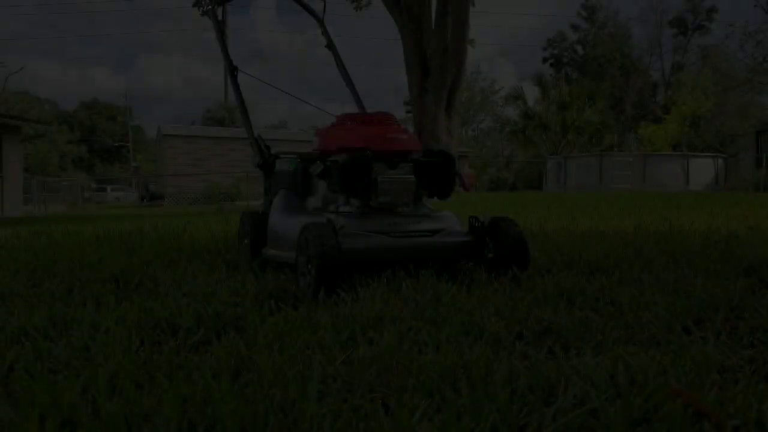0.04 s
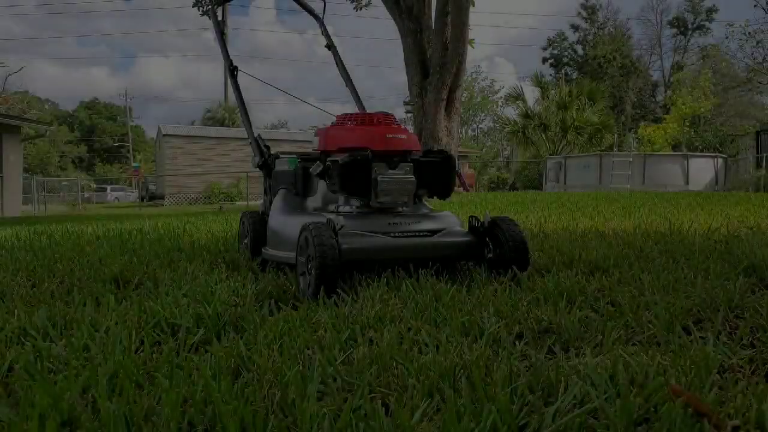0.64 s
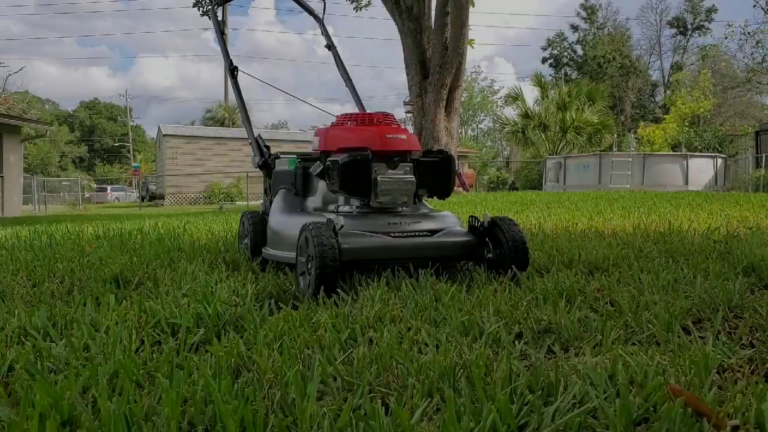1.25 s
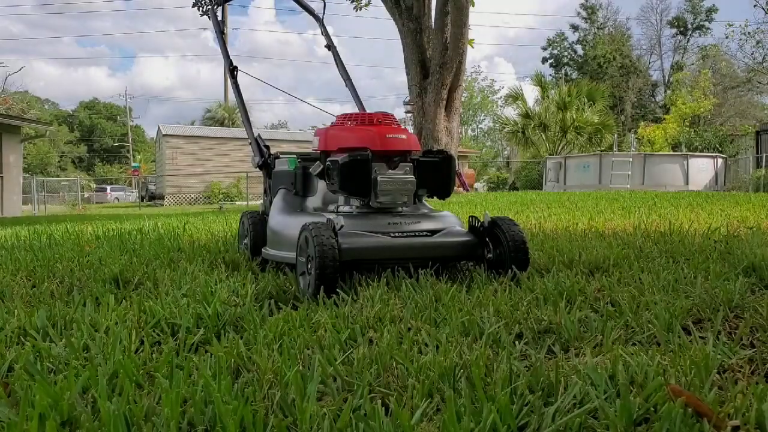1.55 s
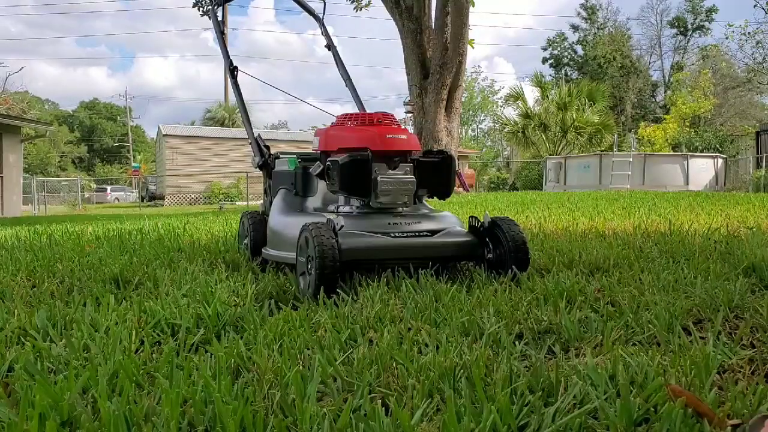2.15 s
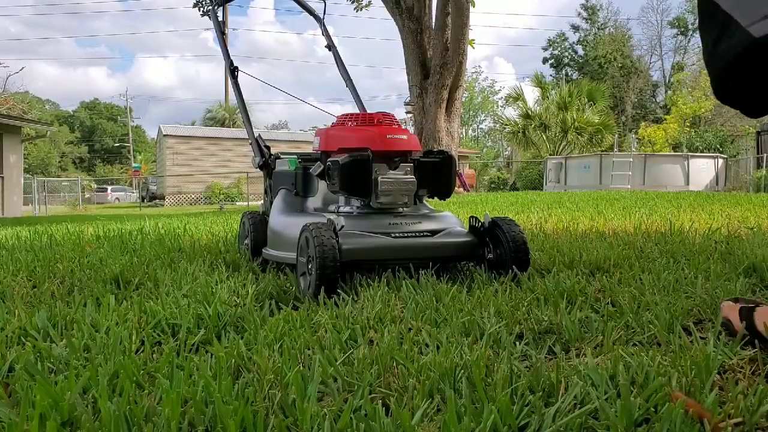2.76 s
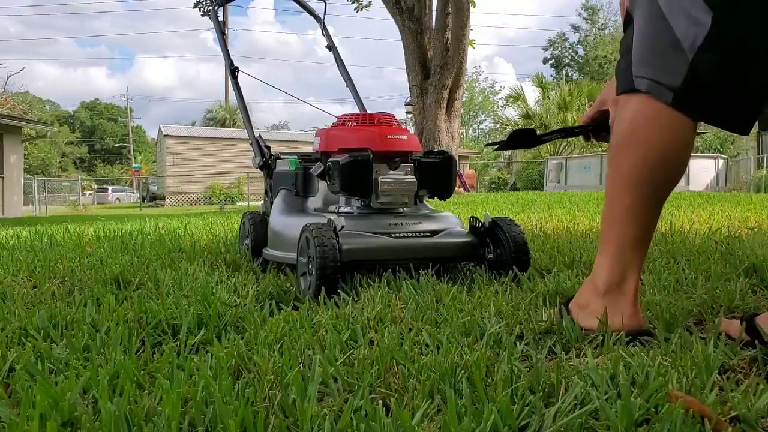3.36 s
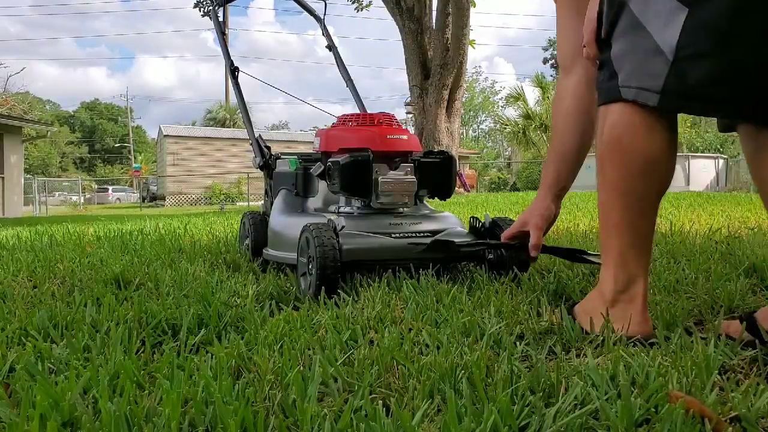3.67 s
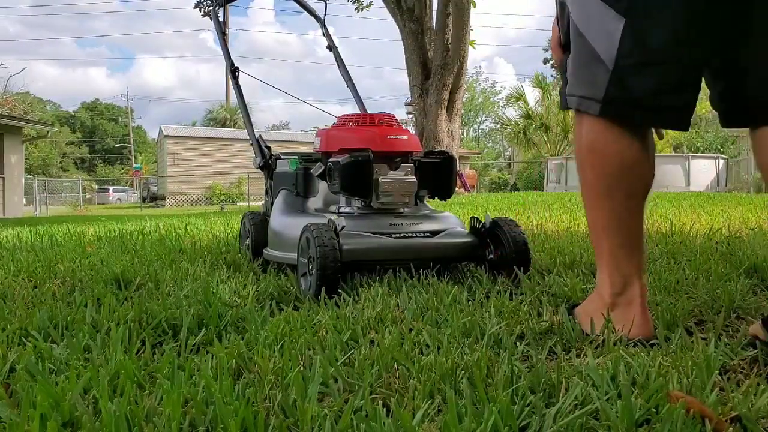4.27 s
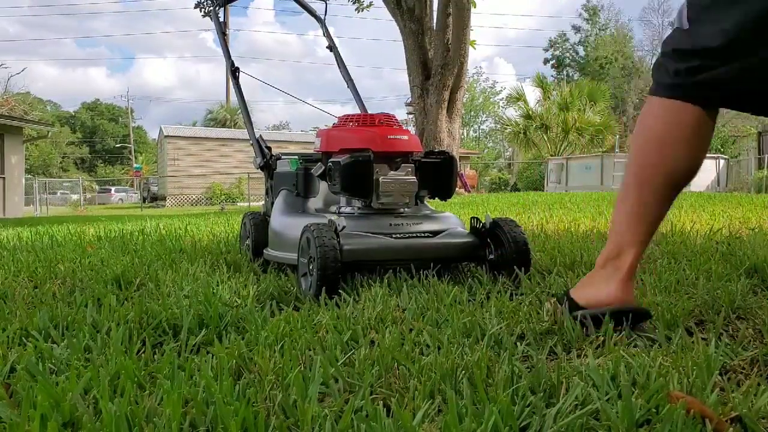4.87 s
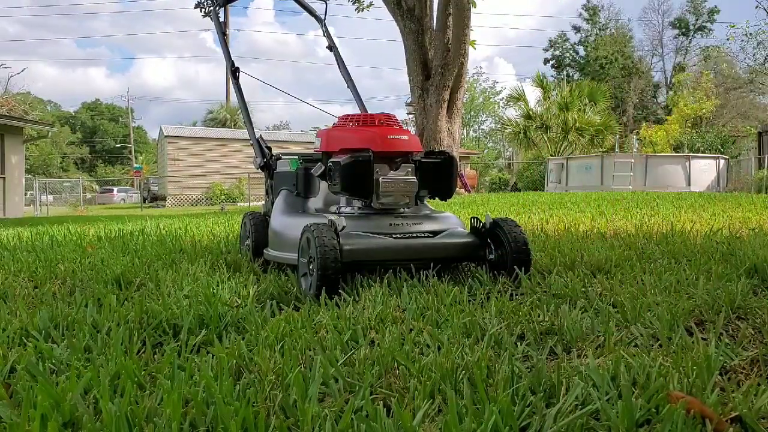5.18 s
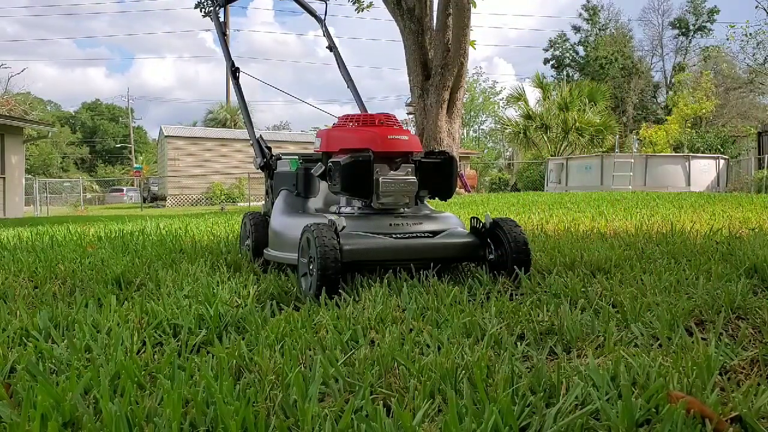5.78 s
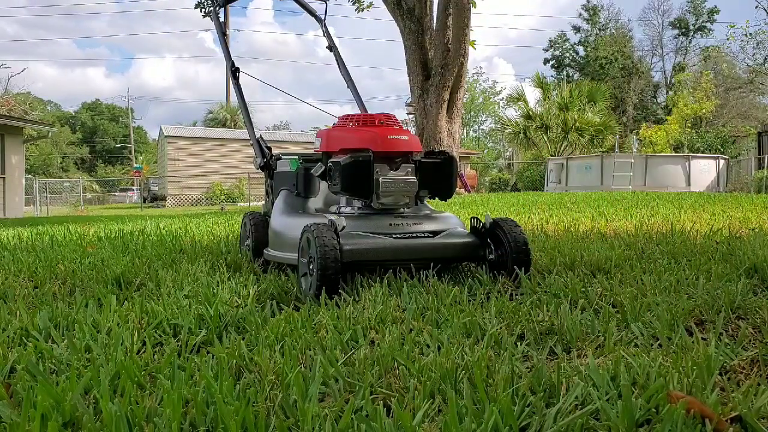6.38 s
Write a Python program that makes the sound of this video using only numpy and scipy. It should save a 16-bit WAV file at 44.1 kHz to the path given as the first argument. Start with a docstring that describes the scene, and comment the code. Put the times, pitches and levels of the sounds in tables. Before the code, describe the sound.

Steel mower blades clash, slide and settle with bright clinks, between soft flip-flop steps on a breezy lawn.

```python
"""Two steel mower blades are laid against a parked mower: they clash, slide and settle with fading clinks.
Each touch makes the steel ring with many tones at once, and the first blow also knocks the mower's deck.
Before and after, someone walks over the lawn in flip-flops: leaves swish, stalks crunch, soles slap.
Light wind, faint insects and the drone of a far engine fill the garden."""
import sys
import numpy as np
from scipy import signal
from scipy.io import wavfile
from scipy.ndimage import uniform_filter1d, minimum_filter1d

SR = 44100
rng = np.random.default_rng(int(sys.argv[2]) if len(sys.argv) > 2 else 0)


def put_to_file(sound):
    """Save the sound as 16-bit audio at rate SR, in the file named by the first command-line argument."""
    columns = np.atleast_2d(sound).T  # one column per channel
    safe = np.clip(columns, -1, 1)
    whole_steps = np.round(safe * 32767)
    wavfile.write(sys.argv[1], SR, whole_steps.astype(np.int16))


N = 292383
T = np.arange(N) / SR

# Slowly swelling open air. Each row: time in seconds, relative rumble in dB, relative breeze in dB.
AIR_LEVELS = [(0.0, -35.5, -48.5), (.55, -39, -49), (1.0, -35.5, -45), (1.4, -34.5, -43.5),
              (2.1, -35, -43.5), (4.0, -35.5, -44), (5.2, -35, -43), (5.8, -35.5, -43), (6.63, -35, -43.5)]
# Steel touches steel. Each row: start in seconds, strength in dB, share of the free ring time,
# treble tilt in dB per octave, favoured pitch in Hz.
BLADE_TOUCHES = [(4.081, -20, 0.32, 5, 4430), (4.0849, -4.5, 0.29, 1, 8700), (4.1024, -3, 0.98, 5.5, 9300),
                 (4.105, -5, .15, -0.5, 8130), (4.123, -11, 0.7, 4, 3690), (4.160, -12.5, 0.72, -1, 3660),
                 (4.190, -16, 0.8, -10, 3615), (4.23, -17.5, 0.99, -8, 3100), (4.252, -14, .5, -4, 3680),
                 (4.264, -14.5, 0.68, -4.5, 3981), (4.291, -21.5, 0.83, -12, 2770),
                 (4.339, -24.5, 0.6, -3, 2770), (4.403, -17, 0.99, -5.5, 4010),
                 (4.432, -22.5, 0.97, -3.5, 5960), (4.503, -26, 1, -7, 2840),
                 (4.615, -24.5, 0.76, -6, 2870), (4.701, -34, .5, -6, 3230)]
# The blades' own tones. Each row: pitch in Hz, relative level in dB, free ring time in seconds,
# left ear over right in dB.
BLADE_TONES = [(1793, -46, 0.35, -4), (2191, -40, 0.42, 1), (2430, -40, 0.35, 0), (2511, -34, 0.36, -1),
               (2767, -35, 0.8, 1), (2860, -42, 0.5, 0), (2980, -38, 0.37, 3), (3205, -35, 0.45, 2),
               (3244, -33, 0.45, 0), (3278, -34, 0.44, 5), (3585, -35, 0.45, -3), (3615, -35, 0.5, -3),
               (3787, -35, 0.45, -5), (3887, -35, 0.36, 2), (3981, -35, 0.65, 0), (4202, -39, 0.48, -4),
               (4290, -37, 0.5, -2), (4430, -39, 0.4, -3), (4592, -32, 0.43, -7), (4778, -34, 0.5, 1),
               (4878, -34, 0.38, 2), (5203, -39, 0.53, -12), (5507, -35, 0.52, -8), (5590, -39, 0.4, -5),
               (6020, -36, 0.8, -5), (6245, -36, 0.42, -3), (6654, -31, 0.35, -1), (7029, -29, 0.26, -12),
               (7195, -34, 0.32, -12), (7394, -38, 0.28, -10), (7905, -32, 0.24, -12),
               (8153, -30, 0.25, -8), (8565, -36, 0.36, -4), (8670, -30, 0.22, 2), (8780, -32, 0.27, -1),
               (9100, -32, 0.23, -2), (9173, -35, 0.2, 3), (9385, -41, 0.4, -5), (9590, -34, 0.33, -11),
               (9660, -32, 0.4, -3), (10250, -42, 0.45, -3), (10530, -35, 0.28, 1), (11039, -34, 0.26, -1),
               (11512, -31, 0.3, 6), (11900, -37, 0.3, -4), (12083, -34, 0.33, -5), (12247, -30, 0.2, -2),
               (12726, -35, 0.32, -9), (12858, -32, 0.24, -12), (14040, -38, 0.3, -6),
               (14909, -34, 0.28, -8), (15286, -37, 0.33, -4), (15719, -30, 0.23, -12)]


def from_db(db):
    """Turn decibels into a gain."""
    return 10 ** (np.asarray(db) / 20)


def rms_one(x):
    """Scale to an average power of 1."""
    return x / np.sqrt(np.mean(x ** 2) + 1e-20)


def panned(left_db):
    """Gains for the two ears; a negative left_db puts the sound to the right."""
    return rms_one(from_db(np.array([[.5], [-.5]]) * left_db))


def at_hz(points, hz):
    """Read a level or other value between rows that start with a frequency."""
    known_hz, values = np.transpose(points)
    return np.interp(np.log(hz), np.log(known_hz), values)


def drift(rate_hz):
    """A smooth random wobble, about 1 in size."""
    step = 40   # samples between random points
    pole = np.exp(-2 * np.pi * step * rate_hz / SR)
    slow = signal.lfilter([1], [1, -2 * pole, pole * pole], rng.standard_normal(N // step + 2002))[2000:]
    return np.interp(np.arange(N) / step, np.arange(len(slow)), rms_one(slow))


def coloured_noise(spectrum, flutter_db):
    """Stereo noise in fluttering bands. Each spectrum row: frequency in Hz, relative level in dB."""
    # How alike the ears are. Each row: frequency in Hz, likeness from -1 (opposite) to 1 (the same).
    ear_likeness = [(60, 0.97), (125, 0.98), (250, 0.8), (500, 0.51), (900, -0.24), (2000, 0.086),
                    (5000, -0.14), (15000, 0.0099)]
    out, edges = 0, 19 * 2 ** np.arange(0, 10.1, .5)
    white = rng.standard_normal((2, 2, N))
    for k, (low, high) in enumerate(zip(edges, edges[1:])):
        hz, flutter = np.sqrt(low * high), drift(8.6)
        if high < spectrum[0][0] or low > spectrum[-1][0]:
            continue
        band = signal.butter(3, [low, high], "band", fs=SR, output="sos")
        mid, side = signal.sosfilt(band, white[k % 2])
        alike = at_hz(ear_likeness, hz)
        gain = from_db(at_hz(spectrum, hz) + flutter_db * flutter)
        out = out + gain * (np.sqrt(1 + alike) * mid + np.sqrt(1 - alike) * side * [[1], [-1]])
    return rms_one(out)


def dying(t, t60):
    """A fade that falls by 60 dB in t60 seconds, the ring time."""
    return np.exp(-np.log(1000) * t / t60)


def add(out, s, sound):
    """Mix a sound in at s seconds."""
    at = int(s * SR)
    out[..., at:at + sound.shape[-1]] += sound[..., :N - at]


def swells(rows):
    """A loudness curve: each swell climbs 10 dB in its rise time and sinks 10 dB in its fall time."""
    power = 0
    for peak_s, db, rise_s, fall_s in rows:
        from_peak = np.maximum((peak_s - T) / rise_s, (T - peak_s) / fall_s)
        power = power + from_db(db - 10 * from_peak) ** 2
    return np.sqrt(power)


def strokes(rows, rise_share):
    """Swells for foot movements, all rising for the same share of their length."""
    return swells([(s, db, rise_share * length, (1 - rise_share) * length) for s, db, length in rows])


def gain_control(x, threshold_db, most_cut_db, sense_s, hold_s, release_db_per_s):
    """A loud sound turns the volume down; it stays down for a while, then creeps back."""
    power = uniform_filter1d(np.mean(x ** 2, axis=0), int(sense_s * SR))
    level_db = 10 * np.log10(np.maximum(power, 1e-12))
    wanted_db = np.clip(level_db - threshold_db, 0, most_cut_db)
    half = int(hold_s * SR / 2)
    held_db = -minimum_filter1d(-wanted_db, 2 * half + 1, origin=half, mode="constant")
    cut_db = np.maximum.accumulate(held_db + release_db_per_s * T) - release_db_per_s * T
    return x * from_db(-cut_db)


def echoes(x, echo_db, dull_hz, count):
    """Add a few dull echoes off the tree, the shed and the house, other ones in each ear."""
    dull = from_db(echo_db) * signal.sosfilt(signal.butter(1, dull_hz, fs=SR, output="sos"), x)
    out = x.copy()
    for ear in range(2):
        for delay_s in rng.uniform(.008, .055, count):
            add(out[ear], delay_s, dull[ear] * dying(delay_s, 0.35))
    return out


def air_levels():
    """The rumble and breeze curves at every sample."""
    seconds, *columns = np.transpose(AIR_LEVELS)
    return [np.interp(T, seconds, column) for column in columns]


def wind(rumble_db, breeze_db):
    """Open air rumbles low while a breeze moves through the trees."""
    # The tone of each noise. Each row: frequency in Hz, relative level in dB.
    rumble_colour = [(20, -40), (30, -23), (42, -8.5), (62, 3), (85, 0.5), (125, -5), (150, -8),
                     (200, -6.5), (260, -15), (400, -33)]
    breeze_colour = [(150, -17.5), (280, 2.5), (480, -2), (800, 3), (1200, -2), (1800, -7), (2600, -18.5),
                     (4000, -25.5), (7000, -34.5), (9000, -33.5), (12000, -33), (15500, -33)]
    low_db, wind_db = air_levels()
    rumble = from_db(low_db + rumble_db) * coloured_noise(rumble_colour, flutter_db=1.17)
    breeze = from_db(wind_db + breeze_db) * coloured_noise(breeze_colour, flutter_db=1.17)
    return rumble + breeze


def far_engine(engine_db, waver_hz, throb_db):
    """A far engine drones on a few wavering tones that swell with the air's rumble."""
    # Each row: pitch in Hz, relative level in dB.
    engine_tones = [(75.5, -45), (90, -43), (106, -47.5), (179, -54.5), (199, -54.5), (266, -57)]
    low_db, _ = air_levels()
    drone = 0
    for hz, db in engine_tones:
        phase = 2 * np.pi * np.cumsum(hz + waver_hz * drift(2.03)) / SR
        drone = drone + np.sqrt(2) * from_db(db + engine_db + throb_db * drift(1.5)) * np.sin(phase)
    return drone * from_db(low_db - low_db.mean())


def insects():
    """Far insects in the trees merge into a steady shrill: narrow bands of noise."""
    # Each row: pitch in Hz, band width in Hz, level in dB.
    shrill_bands = [(9100, 640, -73), (10180, 300, -75), (10500, 250, -80)]
    out = 0
    for hz, width_hz, db in shrill_bands:
        shrill = signal.lfilter(*signal.iirpeak(hz, hz / width_hz, fs=SR), rng.standard_normal((2, N)))
        out = out + from_db(db) * rms_one(shrill)
    return out


def scuffing(scuff_db, grain_db, left_db):
    """Soles press into the dry thatch under the grass with a dull crackle."""
    # Each row: peak time in seconds, relative level in dB, length in seconds.
    presses = [(.9, -61.5, .2), (1.05, -56, .08), (1.44, -63, .17), (1.605, -45.5, .05),
               (1.685, -45.5, 0.042), (2.24, -51, .09), (2.56, -53, 0.083), (2.92, -52, 0.056),
               (3.02, -56.5, 0.076), (3.15, -58, 0.15), (3.44, -61, .2), (5.58, -53, .04),
               (6.06, -47.5, 0.022)]
    # The tone of the thatch. Each row: frequency in Hz, relative level in dB.
    thatch_colour = [(2000, -12), (2800, -2.5), (3800, 0), (5000, -10), (6500, -16), (11000, -12.5)]
    grains = rms_one(from_db(grain_db * drift(300)))
    crackle = grains * coloured_noise(thatch_colour, flutter_db=2.5)
    return from_db(scuff_db) * strokes(presses, rise_share=.45) * crackle * panned(left_db)


def grass(swish_db, grain_db, crunch_db, crunch_grain_db, left_db):
    """Countless leaves flick past the feet; now and then a tuft is crushed."""
    # A foot sweeps by. Each row: peak time in seconds, relative level in dB, length in seconds.
    sweeps = [(.32, -63, .16), (.49, -61, 0.14), (.85, -53.5, 0.08), (.93, -67, .2), (1.05, -49.5, .06),
              (1.29, -53.5, .05), (1.42, -48, 0.13), (1.53, -44.5, 0.12), (1.61, -39.5, 0.066),
              (1.68, -46, .06), (1.87, -53, 0.11), (2.0, -60, .3), (2.18, -47.5, 0.16), (2.27, -46, 0.084),
              (2.36, -46, 0.054), (2.44, -46, 0.058), (2.56, -58, 0.42), (2.91, -53, 0.24),
              (3.13, -57, 0.39), (3.44, -50, 0.25), (4.07, -48.5, 0.055), (4.79, -49, 0.12),
              (4.97, -59.5, 0.47), (5.49, -52, .14), (5.66, -51.5, 0.06), (5.73, -49, .06),
              (5.94, -62, .14), (6.1, -47, 0.044), (6.42, -61, .1), (6.6, -56.5, .1)]
    # Stalks snap. Each row: start in seconds, relative level in dB, fade time in seconds.
    snaps = [(.464, -47, 0.033), (.831, -53, .1), (1.040, -54, .1), (1.091, -39.5, .02),
             (1.525, -37, 0.027), (1.579, -36, .04), (1.596, -36, 0.065), (1.602, -39, 0.061),
             (1.626, -37, 0.036), (2.235, -44.5, 0.071), (2.358, -33, 0.015), (2.428, -28, 0.022),
             (2.440, -54, .05), (2.709, -39, 0.013), (2.910, -54, .08), (3.519, -43, 0.014),
             (4.784, -50, .1), (4.841, -39, 0.022), (5.133, -35.5, 0.01), (5.729, -46, 0.027),
             (6.05, -40.5, 0.086), (6.104, -48, 0.027), (6.380, -42.5, .02)]
    # The tone of leaves and of stalks. Each row: frequency in Hz, relative level in dB.
    leaf_colour = [(1000, -14), (2200, -6.5), (3800, -4), (6500, -7.5), (8200, -8), (11500, -4), (16000, 3)]
    stalk_colour = [(1000, -6), (2200, -4), (3800, -2.5), (6500, -5), (8200, -8.5), (11500, -7), (16000, 1)]
    swish = from_db(swish_db) * strokes(sweeps, rise_share=.58) * rms_one(from_db(grain_db * drift(550)))
    crunch = np.zeros(N)
    for s, db, t60 in snaps:
        add(crunch, s, from_db(crunch_db + db) * dying(T[:SR // 4], t60))
    crunch *= rms_one(from_db(crunch_grain_db * drift(700)))
    leaves = swish * coloured_noise(leaf_colour, flutter_db=2.0)
    stalks = crunch * coloured_noise(stalk_colour, flutter_db=1.5)
    return (leaves + stalks) * panned(left_db)


def flip_flops(thud_hz, thud_t60, slap_t60, left_db):
    """A rubber sole claps on the heel: a few quickly dying tones over a short thud."""
    # Each row: start in seconds, level in dB, main pitch in Hz, thud over clap in dB.
    heel_slaps = [(1.525, -28.5, 2220, -7), (2.428, -23.5, 1805, 7.5), (5.729, -29.5, 2600, 6)]
    clap_tones = [(.8, 1), (1, -1.25), (1.2, 0.72), (1.6, -0.21), (2.2, 0.18)]
    out, t = np.zeros((2, N)), T[:SR // 10]
    for s, db, hz, thud_db in heel_slaps:
        clap = sum(gain * np.sin(2 * np.pi * hz * ratio * t) for ratio, gain in clap_tones)
        thud = from_db(thud_db) * np.sin(2 * np.pi * thud_hz * t) * dying(t, thud_t60)
        add(out, s, from_db(db) * (clap * dying(t, slap_t60) + thud) * panned(left_db))
    return out


def deck_knock(struck_s):
    """The first blow also knocks the mower's deck, which rings low and briefly."""
    # Each row: pitch in Hz, level in dB, ring time in seconds.
    deck_tones = [(500, -34.5, 0.086), (797, -35, 0.12), (1305, -39, 0.17)]
    out, t = np.zeros((2, N)), T[:SR // 4]
    for hz, db, t60 in deck_tones:
        add(out, struck_s, from_db(db) * np.sin(2 * np.pi * hz * t) * dying(t, t60))
    return out


def grinding(grit_db, left_db, width_hz, direct_db, body_db):
    """The edges slide after the hardest touches, and grit keeps the pressed steel sounding."""
    # Each row: peak time in seconds, relative level in dB, rise and fall times in seconds.
    slides = [(4.085, -18, .003, 0.01), (4.104, -18, 0.0065, 0.012), (4.155, -31.5, 0.065, .06),
              (4.265, -31.5, 0.06, 0.053)]
    # The tone of the rubbing. Each row: frequency in Hz, relative level in dB.
    grit_colour = [(400, -12), (1000, 1), (2000, -2), (3500, 0), (6000, 1.5), (9500, -1), (15500, -8)]
    sliding = (T > BLADE_TOUCHES[0][0]) & (T < BLADE_TOUCHES[-1][0])
    grit = from_db(grit_db * drift(400)) * coloured_noise(grit_colour, flutter_db=0.0)
    friction = (swells(slides) * grit)[:, sliding]
    body = sum(signal.lfilter(*signal.iirpeak(hz, hz / width_hz, fs=SR), friction)
               for hz, *_ in BLADE_TONES)
    out = np.zeros((2, N))
    out[:, sliding] = from_db(direct_db) * friction + from_db(body_db) * body
    return out * panned(left_db)


def clatter_tones(spread_db, left_db, count):
    """Faint, quickly dying tones between the blades' strong ones: the clatter in each clank."""
    # Each row: frequency in Hz, relative level in dB.
    clatter_colour = [(500, -55), (1200, -45), (2000, -41.5), (3300, -33), (6000, -33.5), (9000, -39),
                      (11000, -41), (13000, -33), (16000, -41)]
    hz = 500 + (np.arange(count) + rng.random(count)) * 15300 / count
    level_db = at_hz(clatter_colour, hz) + spread_db * rng.standard_normal(count)
    t60 = .16 * (np.maximum(hz, 3000) / 5000) ** -.3
    return np.column_stack([hz, level_db, t60, left_db + 3 * rng.standard_normal(count)])


def blades(ring_db, scatter_db, build_s, detune, right_lead_s, most_lead_rad, favour_db,
           landed_s, grass_db_per_s):
    """Every touch rings all the blades' tones, each at its own strength; resting steel rings shorter."""
    tones = np.vstack([BLADE_TONES, clatter_tones(spread_db=2.5, left_db=-6.0, count=90)])
    hz, level_db, t60, left_db = tones.T
    # each tone spreads in its own pattern, so the ears get different levels and phases
    ears = np.hstack([panned(db) for db in left_db])
    ear_phase = np.minimum(2 * np.pi * hz * right_lead_s, most_lead_rad)
    out = np.zeros((2, N))
    for s, strength_db, share, tilt_db, favoured_hz in BLADE_TOUCHES:
        t = T[:int(SR * share * 2 / 3)]
        colour_db = tilt_db * np.log2(np.maximum(hz, 2500) / 5000)
        colour_db += scatter_db * rng.standard_normal(len(hz))
        # tones that swing widest at the touched spot take the most energy
        colour_db += favour_db * np.exp(-(np.log(hz / favoured_hz) / 0.024) ** 2)
        gain = ears * from_db(ring_db + level_db + strength_db + colour_db)
        # the blade rests on a new spot each time, which pulls each pitch a little
        pulled_hz = hz * (1 + detune * (1 - share ** 2) * rng.standard_normal(len(hz)))
        phase = 2 * np.pi * (np.outer(pulled_hz, t) + rng.random((len(hz), 1)))
        lead = (ear_phase + 0.63 * rng.standard_normal(len(hz)))[:, None]
        decay = dying(t, (t60 * share)[:, None])
        ring = np.array([gain[0] @ (np.sin(phase) * decay), gain[1] @ (np.sin(phase + lead) * decay)])
        # the ringing needs a moment to fill the blade; once it lies in the grass, the stalks choke it
        build_up = 1 - np.exp(-t / build_s)
        in_grass_s = np.maximum(t - max(landed_s - s, 0), 0)
        add(out, s, ring * build_up * from_db(-grass_db_per_s * in_grass_s))
    return out


def scene():
    """Blades and footsteps a little to the right, open air all round."""
    steel = blades(ring_db=3, scatter_db=1.0, build_s=0.00084, detune=0.0022, right_lead_s=.00007,
                   most_lead_rad=1.74, favour_db=10.5, landed_s=4.36, grass_db_per_s=92)
    steel += grinding(grit_db=1.5, left_db=-2.0, width_hz=65, direct_db=-9, body_db=3.5)
    steel += deck_knock(struck_s=4.085)
    steps = grass(swish_db=2.5, grain_db=3.5, crunch_db=1, crunch_grain_db=5, left_db=-9.5)
    steps += scuffing(scuff_db=1, grain_db=6.0, left_db=-0.5)
    steps += flip_flops(thud_hz=480, thud_t60=0.0078, slap_t60=0.0092, left_db=-6.5)
    near = echoes(steel + steps, echo_db=-14, dull_hz=5000, count=6)
    air = wind(rumble_db=-1.36, breeze_db=3.0)
    return near + air + far_engine(engine_db=-1.5, waver_hz=0.97, throb_db=2.0) + insects()


def record(dry):
    """The volume dips under the clank, and the highest treble is cut steeply."""
    ducked = gain_control(dry, threshold_db=-27, most_cut_db=3.0, sense_s=0.0085, hold_s=1.0,
                          release_db_per_s=5)
    cutoff_hz = 15900
    return signal.sosfilt(signal.ellip(12, .2, 80, cutoff_hz, fs=SR, output="sos"), ducked)


dry = scene()
out = record(dry)
put_to_file(out)
```